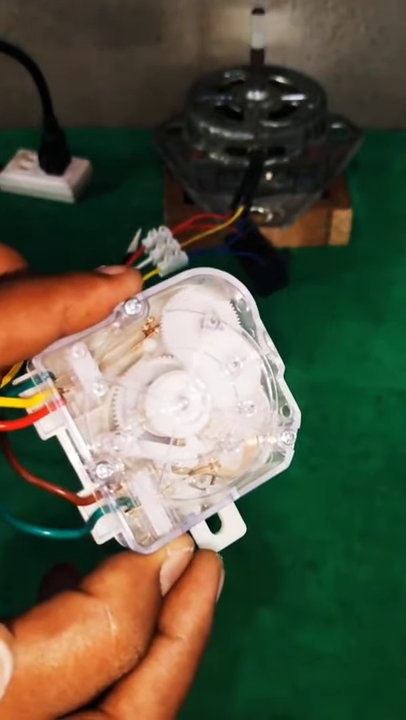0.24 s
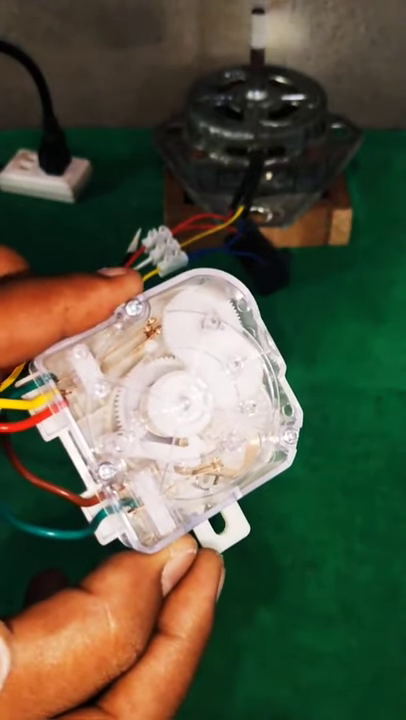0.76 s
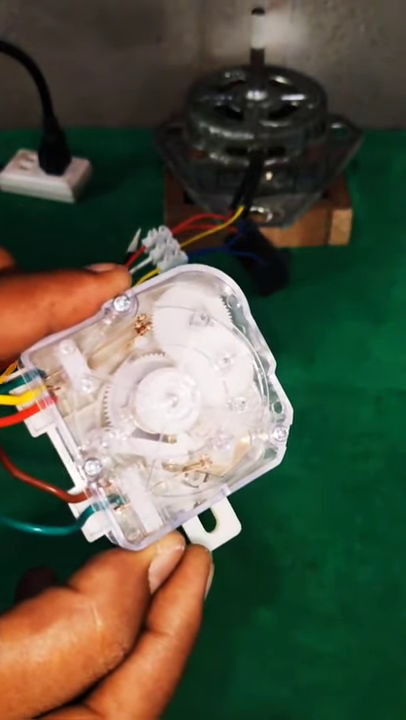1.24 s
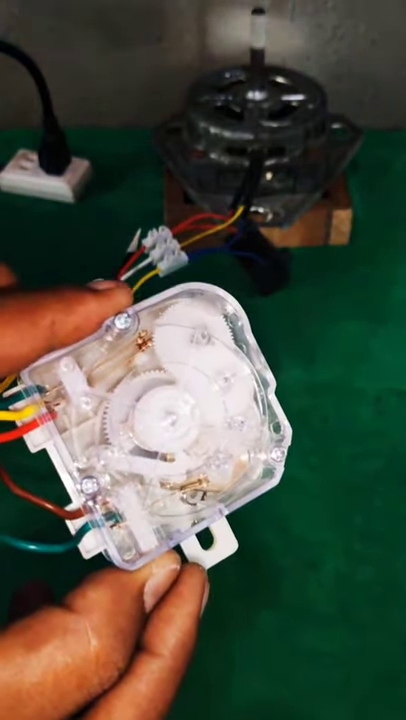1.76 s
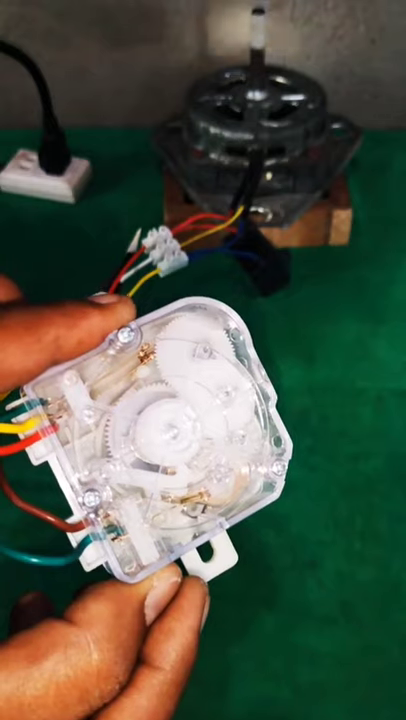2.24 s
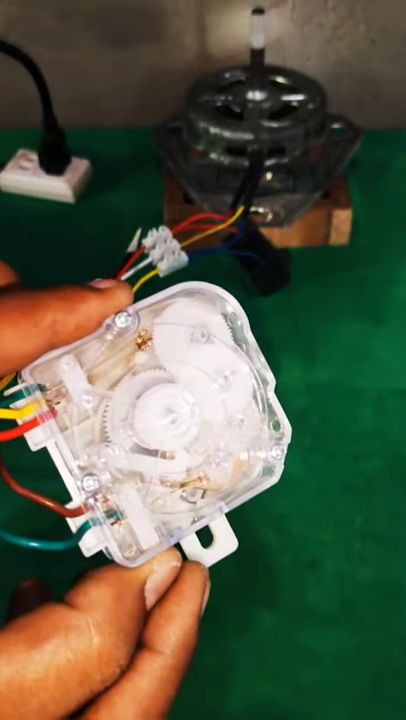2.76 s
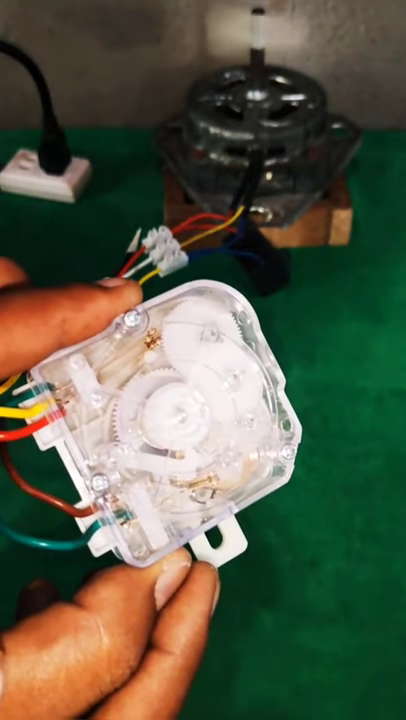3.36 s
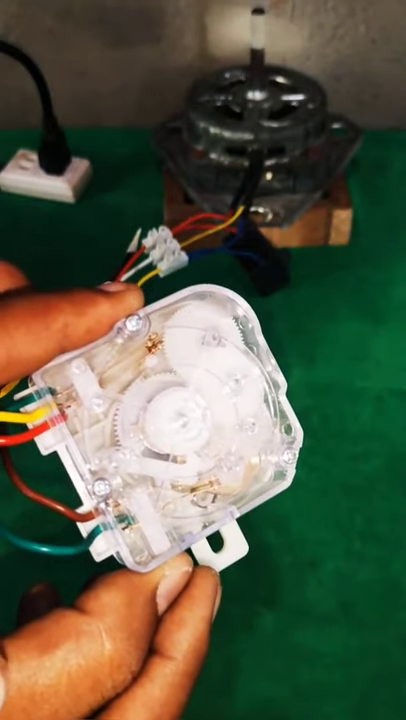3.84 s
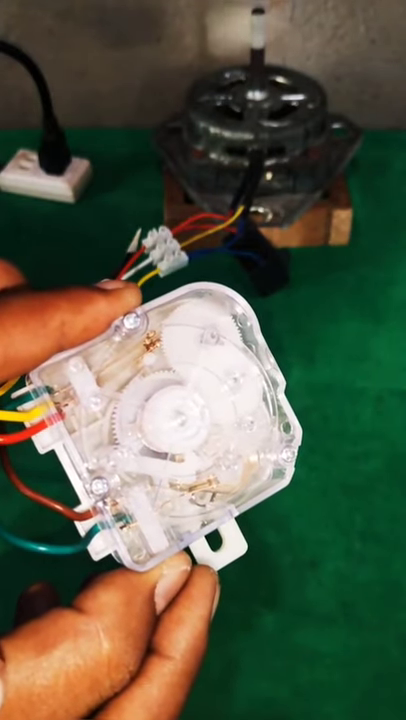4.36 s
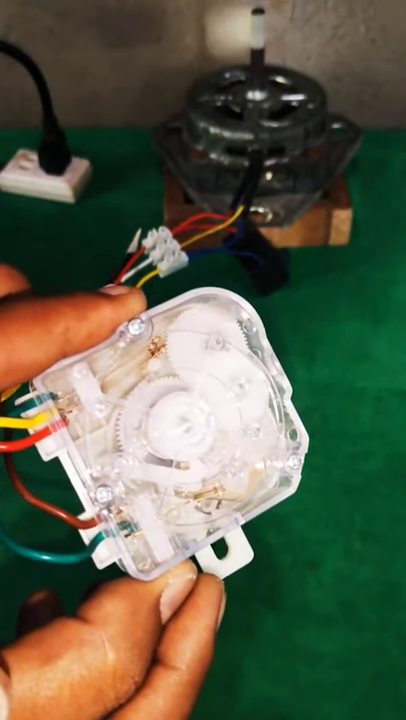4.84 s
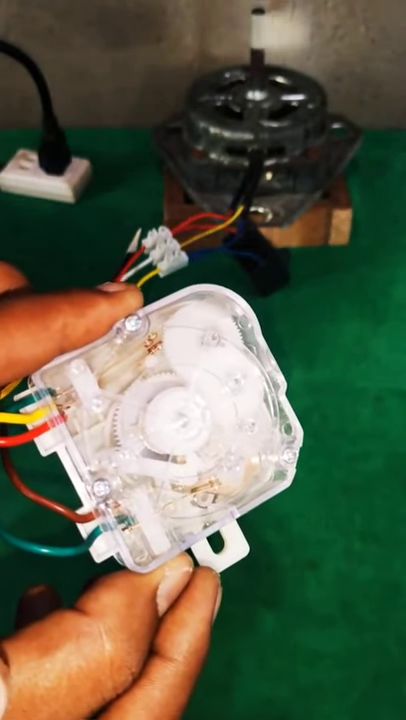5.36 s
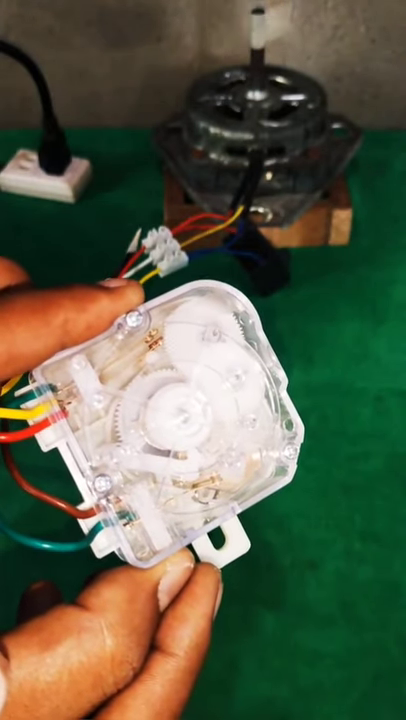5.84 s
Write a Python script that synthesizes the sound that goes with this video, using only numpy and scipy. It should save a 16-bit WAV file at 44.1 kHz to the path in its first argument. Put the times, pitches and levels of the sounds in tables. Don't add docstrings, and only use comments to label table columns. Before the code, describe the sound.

From 0 s a bare induction motor is already running on a wooden block, giving a loud, steady low hum near 120 Hz with faint beating overtones and a grainy chatter pulsing with each turn. Loose bearings knock irregularly in small metallic clusters, with a notably hard knock and snap around 0.17 s and another strong knock near 2.34 s. The bench adds a wandering low throb and occasional thumps. Close by, a clockwork timer ticks very fast, around 36 ticks a second, thin and light, gradually slowing slightly and weakening. At about 4.8 s a small contact snap comes and the hum collapses within a tenth of a second. Until 6.1 s the rotor coasts on a soft whirr, shuddering, with a sharp clack at 5.12 s and denser knocks and rattles from 5.4 s. Dry, close mono pickup, faint hiss.

```python
import sys
import numpy as np
from scipy import signal
from scipy.fft import rfft, irfft, next_fast_len
from scipy.io import wavfile
from scipy.ndimage import uniform_filter1d

SR = 44100
rng = np.random.default_rng(int(sys.argv[2]) if len(sys.argv) > 2 else 0)


def store_pcm(level_fs):
    pcm = np.round(np.clip(level_fs, -1, 1) * 32767).astype(np.int16)
    wavfile.write(sys.argv[1], SR, np.atleast_2d(pcm).T)


def convert_level_to_amplitude(level_db):
    exponent = np.asarray(level_db, float) / 20
    return 10 ** exponent


N = 268524


def rms_one(x):
    return x / np.sqrt(np.mean(x ** 2) + 1e-20)


def in_time(rows):
    s, *columns = np.transpose(rows)
    return [np.interp(np.arange(N) / SR, s, c) for c in columns]


def drift(rate_hz):
    r = np.exp(-80 * np.pi * rate_hz / SR)
    noise = rng.standard_normal(N // 40 + 1102)
    slow = signal.lfilter([1], [1, -2 * r, r * r], noise)[1100:]
    return np.interp(np.arange(N) / 40, np.arange(len(slow)), rms_one(slow))


def colour(x, points):
    size = next_fast_len(N + SR // 4, real=True)
    hz, db = np.transpose(points)
    log_hz = np.log(np.fft.rfftfreq(size, 1 / SR) + 1)
    gain_db = np.interp(log_hz, np.log(hz), db, left=-70, right=-90)
    cepstrum = irfft(gain_db * np.log(10) / 20, size)
    cepstrum[1:size // 2] *= 2
    cepstrum[size // 2 + 1:] = 0
    return rms_one(irfft(rfft(x, size) * np.exp(rfft(cepstrum)), size)[:N])


def resonance(x, hz, width_hz):
    r = np.exp(-np.pi * width_hz / SR)
    poles = [1, -2 * r * np.cos(2 * np.pi * hz / SR), r * r]
    return signal.lfilter([(1 - r * r) / 2, 0, (r * r - 1) / 2], poles, x)


def strike(times_s, levels_db, hz, t60_s, spread_db):
    contact_width_hz = 950
    clicks = np.full(N, 1e-18)
    at = np.clip((np.asarray(times_s) * SR).astype(int), 0, N - 1)
    peaks = convert_level_to_amplitude(levels_db + spread_db * rng.standard_normal(len(at)))
    clicks[at] = peaks * rng.choice([-1, 1], len(at))
    r = convert_level_to_amplitude(-60 / (t60_s * SR))
    w = 2 * np.pi * hz / SR
    touch = resonance(clicks, hz, contact_width_hz)
    return signal.lfilter([0, np.sin(w)], [1, -2 * r * np.cos(w), r * r], touch)


def grains(per_s, spread_db):
    sizes = convert_level_to_amplitude(spread_db * np.minimum(rng.exponential(1, N), 4)) * rng.choice([-1, 1], N)
    return rms_one(sizes * (rng.random(N) < per_s / SR))


def swell(s, length_s):
    out, start = np.zeros(N), int(s * SR)
    age = np.arange(int(length_s * SR)) / (length_s * SR)
    out[start:start + len(age)] = np.abs(np.sin(np.pi * age ** 0.56))[:N - start]
    return out


def swing(s, db, hz, length_s):
    out = swell(s, length_s)
    on = np.flatnonzero(out)
    out[on] *= convert_level_to_amplitude(db) * np.sin(2 * np.pi * hz * (on / SR - s))
    return out


def hiss():
    # f/Hz, density/dB per Hz
    hiss_spectrum = [(3000, -2), (4500, 2.5), (5500, -2), (7000, -4.5), (10000, -5), (14000, -7),
                     (18000, -4.5)]
    rms_db = -82.5 + 5.5
    return convert_level_to_amplitude(rms_db) * colour(rng.standard_normal(N), hiss_spectrum)


def timer():
    # t/s, ticks counted
    ticks = [(0, -.4), (.064, 1.85), (.492, 17.85), (.546, 19.85), (.817, 29.85), (.932, 33.85),
             (1.206, 43.85), (1.588, 57.85), (1.918, 69.85), (2.417, 87.85), (2.794, 101.85),
             (3.524, 127.85), (4.15, 149.85), (4.679, 167.85), (4.872, 173.85), (5.109, 181.85),
             (5.425, 191.85), (5.908, 207.85), (6.09, 213.88)]
    # f/Hz, tick level/dB, tock level/dB, t60/s
    case = [(2450, -63, -65, .01), (2850, -64, -65, .015), (3080, -60, -61, .03), (3350, -65, -66, .014),
            (3800, -68, -71, .01), (4500, -71, -75, .015), (6000, -84, -87, .01), (9000, -87, -90, .01),
            (11000, -87, -90, .01), (13800, -81, -89, .008), (14500, -78, -86, .01),
            (15100, -79, -87, .008)]
    # t/s, level/dB, f/Hz, t60/s
    snaps = [(0.168, -41, 3100, 0.018), (0.168, -65, 4330, .015), (.1665, -62, 6000, .012),
             (.168, -64, 8200, .012), (.169, -70, 7100, .012), (0.173, -35, 1138, 0.15),
             (5.123, -37, 1810, 0.087), (5.1235, -41, 2070, .03), (5.124, -43, 2330, .025),
             (4.808, -61, 5600, 0.0085), (4.809, -67, 8250, .01), (4.81, -69, 10000, .008)]
    s, count = np.transpose(ticks)
    number = np.arange(0, int(count[-1]) + 1)
    times_s = np.interp(number - .15, count, s) + 0.00071 * rng.standard_normal(len(number))
    out = np.zeros(N)
    for hz, tick_db, tock_db, t60_s in case:
        level_db = np.where(number % 2, tock_db, tick_db) + 4.5 - 0.84 * times_s
        out += strike(times_s, level_db, hz, t60_s, spread_db=2.5)
        out += strike(times_s + .003, level_db - 3, hz, t60_s, spread_db=3)
    return out + sum(strike([s], db, hz, t60_s, spread_db=0) for s, db, hz, t60_s in snaps)


def bench():
    # t/s, level/dB
    rumble_bed = [
        (0, -45),
        (4.8, -45),
        (4.95, -52.5),
        (5.17, -62),
        (5.27, -53),
        (6.09, -50),
    ]
    # t/s, peak level/dB
    surges = [(.01, -42), (.22, -34), (.34, -41), (0.469, -47), (.76, -38), (.88, -48), (1.161, -37),
              (1.62, -36.5), (1.71, -46), (1.85, -43), (2.03, -37.5), (2.2, -38), (2.559, -40.5),
              (2.939, -43), (3.36, -42), (3.51, -46), (3.68, -41), (3.9, -40.5), (4.19, -39.5),
              (4.371, -40.5), (4.66, -49), (4.83, -37.5), (5.74, -55)]
    # t/s, peak level/dB, f/Hz, length/s
    swings = [(0.164, -32, 77, 0.098), (3.85, -33.5, 76.5, 0.14), (4.801, -40, 69.6, 0.045),
              (5.09, -42, 142, 0.1), (5.22, -53, 139.3, 0.14), (5.49, -41, 78.3, 0.18),
              (5.576, -39, 83.7, 0.13), (5.698, -32.5, 82.6, 0.09), (5.751, -56, 590, 0.24),
              (5.768, -55.5, 765, 0.15), (5.841, -43, 78, 0.21), (5.31, -48.5, 131, 0.11),
              (5.95, -54, 151, 0.089), (4.99, -50, 142, 0.069)]
    surge_half_width_s = .03
    shake = resonance(resonance(rng.standard_normal(N), 67, 46), 80, 54)
    even = shake / np.sqrt(uniform_filter1d(shake ** 2, size=1500) + 0.045 * np.mean(shake ** 2))
    even = signal.sosfilt(signal.butter(4, [52, 95], "band", fs=SR, output="sos"), even)
    t = np.arange(N) / SR
    power = convert_level_to_amplitude(in_time(rumble_bed)[0]) ** 2
    for s, db in surges:
        power += convert_level_to_amplitude(db + 0.5) ** 2 * np.exp(-2 * ((t - s) / surge_half_width_s) ** 2)
    return np.sqrt(power) * rms_one(even) + sum(swing(*row) for row in swings)


def coasting():
    # t/s, block peak level/dB, block f/Hz, rattle level/dB, length/s
    shudders = [(4.865, -38.5, 218, -54.5, 0.047), (4.952, -36.5, 198, -46.5, 0.041),
                (5.053, -35.5, 209, -52, 0.044), (5.12, -33.5, 223.6, -42, 0.048),
                (5.14, -34.5, 205, -49.5, 0.04), (5.299, -46.5, 254, -55, 0.065),
                (5.402, -37.5, 200, -45.5, 0.03), (5.424, -34, 203, -45.5, 0.083),
                (5.502, -39.5, 211, -42, 0.05), (5.531, -38.5, 218, -44, 0.068),
                (5.545, -41, 197, -39, 0.037), (5.604, -41, 213, -44.5, 0.035),
                (5.647, -39, 234, -38.5, 0.015), (5.661, -32, 210, -41, 0.06),
                (5.727, -49, 264, -44, 0.038), (5.845, -40.5, 214, -44.5, 0.054),
                (5.905, -36.5, 202, -42, 0.056), (5.944, -61, 183, -44, 0.055),
                (5.979, -40, 200, -42.5, 0.047), (6.064, -36.5, 213, -43, 0.052)]
    # f/Hz, density/dB per Hz
    rattle_spectrum = [(76, -73.5), (130, -32), (211, 2), (341, -15.5), (407, -14.5), (457, -32.5),
                       (553, -10.5), (622, -18), (752, -14), (1290, -20), (1590, -45), (1710, -15.5),
                       (1840, -19), (3250, -46), (4290, -55), (5580, -85), (9440, -120)]
    # f/Hz, width/Hz, level/dB
    loose_parts = [(432, 52, 10.5), (590, 15, 5.5), (765, 18, -0.5), (880, 6.7, 10), (1310, 45, 13),
                   (1830, 59, 4.5), (1940, 57, -6), (2075, 75, 6), (2310, 37, 9.5), (3640, 55, 9),
                   (4500, 42, 10)]
    # t/s, level/dB
    coast = [
        (4.8, -51),
        (4.886, -53.5),
        (5.2, -51.5),
        (5.388, -54),
        (5.456, -48.5),
        (5.6, -52.5),
        (6.089, -51),
    ]
    # f/Hz, density/dB per Hz
    whirr_spectrum = [(59, -32), (100, -5.5), (165, -18.5), (200, 0), (387, -14), (418, -11.5),
                      (453, -25.5), (497, -11), (538, -31.5), (1750, -18.5), (4290, -43), (5580, -67),
                      (9440, -120)]
    block, shaking = np.zeros(N), np.zeros(N)
    for s, block_db, hz, rattle_db, length_s in shudders:
        block += swing(s, block_db, hz, length_s)
        shaking = np.maximum(shaking, convert_level_to_amplitude(rattle_db + 3.5) * swell(s + 0.0015, 1.54 * length_s))
    contacts = grains(450, 2.2) + 0.45 * rng.standard_normal(N)
    knocking = colour(shaking * contacts, rattle_spectrum)
    knocking += sum(convert_level_to_amplitude(db) * resonance(knocking, hz, width_hz) for hz, width_hz, db in loose_parts)
    rattle = convert_level_to_amplitude(-3.0) * np.sqrt(np.mean(shaking ** 2)) * rms_one(knocking)
    whirr_db, = in_time([(4.75, -89.5), *coast])
    whirr = convert_level_to_amplitude(whirr_db + 0.5 + 0.53 * drift(3.5)) * colour(rng.standard_normal(N), whirr_spectrum)
    return block + rattle + whirr


def knocks():
    # t/s, peak level/dB
    driven_knocks = [(0.0997, -39), (0.1295, -43.5), (0.1666, -24.5), (0.2004, -32.5), (0.3997, -46),
                     (0.482, -41), (0.5741, -36), (0.6075, -35.5), (0.8065, -33), (0.9815, -42),
                     (1.0157, -33), (1.05, -30), (1.1169, -43), (1.2146, -34.5), (1.4254, -46),
                     (1.4583, -32), (1.493, -42), (1.5243, -44), (1.5589, -44), (1.6592, -36.5),
                     (1.81, -42), (1.8342, -40), (1.8682, -37.5), (1.9016, -34.5), (2.028, -40),
                     (2.0955, -43), (2.2438, -46), (2.2777, -40), (2.3106, -34), (2.3441, -28.5),
                     (2.4438, -41.5), (2.505, -45), (2.543, -36.5), (2.6936, -42), (2.714, -38),
                     (2.753, -35.5), (2.7881, -33.5), (2.8856, -42), (2.9866, -33), (3.1615, -39),
                     (3.195, -34.5), (3.2291, -36), (3.261, -46.5), (3.3308, -38.5), (3.3878, -42),
                     (3.604, -36), (3.6381, -32.5), (3.6713, -35.5), (3.8638, -39), (3.955, -45.5),
                     (4.014, -41), (4.0472, -33), (4.0805, -36.5), (4.1814, -44), (4.2065, -42.5),
                     (4.2802, -36), (4.455, -38.5), (4.4897, -34), (4.5231, -30.5), (4.6242, -44)]
    # t/s, peak level/dB
    loose_knocks = [(4.8308, -39), (4.8405, -33), (4.8625, -50), (4.963, -47), (4.9723, -40), (5.0687, -39),
                    (5.1283, -34.5), (5.1423, -33), (5.1517, -31), (5.2096, -44.5), (5.4106, -40),
                    (5.4199, -45), (5.4368, -44), (5.4422, -41), (5.4507, -42), (5.4603, -26.5),
                    (5.4669, -42), (5.4751, -44), (5.4832, -53), (5.5071, -35), (5.5133, -33.5),
                    (5.5187, -42), (5.5258, -31), (5.5411, -45), (5.5519, -49), (5.5599, -37),
                    (5.5649, -35), (5.57, -32), (5.5801, -30.5), (5.6244, -33), (5.6469, -44),
                    (5.6542, -41), (5.6615, -44), (5.6709, -27), (5.6816, -30), (5.6878, -38),
                    (5.6993, -49), (5.7096, -43), (5.7199, -43), (5.7358, -31), (5.7414, -35),
                    (5.7488, -42), (5.7545, -42), (5.8607, -32.5), (5.8797, -40), (5.894, -43),
                    (5.9263, -37), (5.9368, -35), (5.9471, -33.5), (5.9538, -41), (5.9711, -43),
                    (5.9768, -45), (5.9913, -30.5), (6.0006, -33.5), (6.0056, -41), (6.0161, -48),
                    (6.0328, -45), (6.0539, -41), (6.0761, -38.5), (6.0817, -32.5)]
    # f/Hz, level/dB, t60/s
    shield = [(1700, -5, 0.045), (1785, 0, 0.11), (1923, 2.5, 0.054), (2070, -3.5, 0.06),
              (2315, -5.5, 0.04), (2460, -9.5, 0.03), (3000, -11, 0.019), (3630, -20.5, 0.065),
              (4460, -25, 0.064), (5680, -25, 0.031), (6900, -27.5, 0.017)]
    # f/Hz, level/dB, t60/s
    housing = [(681, -1.5, 0.054), (700, -2, 0.021), (973, -2, 0.082), (1111, 2.5, 0.044),
               (1193, 1.5, 0.028), (1333, 3, 0.025)]
    housing_share_db, housing_top_db = -3, -34.5
    out = np.zeros(N)
    for table, ring, bounce_db, gain_db in [(driven_knocks, .26, -7, -4.5), (loose_knocks, .42, -9, -6)]:
        s, peak_db = np.transpose(table)
        touches_s = np.concatenate([s - .0008, s + .0018])
        touch_db = np.concatenate([peak_db, peak_db + bounce_db])
        for hz, db, t60_s in shield:
            out += strike(touches_s, touch_db + db + gain_db, hz, ring * t60_s, spread_db=0.0)
    s, peak_db = np.transpose([*driven_knocks, *loose_knocks])
    low_db = np.minimum(peak_db + housing_share_db, housing_top_db)
    for hz, db, t60_s in housing:
        out += strike(s + 0.00301, low_db + db - 10.5, hz, t60_s, spread_db=1.0)
    out -= .7 * resonance(out, 1500, 250)
    return signal.sosfilt(signal.butter(2, 4200, fs=SR, output="sos"), out)


def beats():
    # f/Hz, level/dB re hum, place in the cycle (0-1)
    beat_lines = [(325, -31, .35), (568, -27, .35), (588, -26, 0.05), (639, -29.5, 0.5), (651, -26.5, 0.8),
                  (679, -28.5, .89), (717, -30, 0.97), (708, -32, 0.2), (738.5, -29.5, 0.2),
                  (807, -40, .62), (968, -34, .15), (975, -32, 0.3), (1187, -30.5, .05), (1208, -26.5, 1),
                  (1141, -29.5, 0.2), (1247, -31, 0.2), (1304, -34, 0.5)]
    slip_hz, slip_start_s, depth_db = 2.29, .1675, 17
    t = np.arange(N) / SR
    cycle = slip_hz * (t - slip_start_s)
    out = np.zeros(N)
    for hz, db, place in beat_lines:
        swell_db = depth_db * (np.cos(2 * np.pi * (cycle - place)) - 1)
        level = convert_level_to_amplitude(db + swell_db + 0.94 * drift(4.9))
        out += level * np.cos(2 * np.pi * hz * t + 0.7 * drift(4.0))
    return out


def motor():
    # t/s, hum level/dB, chatter level/dB
    running = [
        (0.0, -27.5, -45),
        (0.64, -27.5, -47.5),
        (2.61, -27.5, -46.5),
        (4.76, -27, -47.5),
    ]
    # t/s, hum level/dB, chatter level/dB
    power_off = [
        (4.82, -28.5, -45.5),
        (4.845, -33, -43.5),
        (4.87, -44, -49),
        (4.9, -44, -52),
        (4.96, -80, -65),
        (5.0, -90, -66),
    ]
    # pull multiple, level/dB rms, phase/rad
    hum_lines = [(1, 0.5, -2.5), (2, -21, -5), (3, -31.5, -6.5), (5, -36, 2.5), (6, -36, 2),
                 (7, -31.5, 1.54), (8, -36.5, 4.5), (10, -41.5, 0.5)]
    # pull multiple, turn multiple, level/dB re hum
    side_lines = [(0, 11, -32.5), (0, 26, -34), (1, 1, -35.5), (2, -1, -50), (2, 1, -33.5), (3, 1, -37),
                  (3, 2, -46), (3, 3, -40.5), (4, 2, -43.5), (4, 3, -39), (7, 2, -44.5), (10, 1, -36)]
    # f/Hz, density/dB per Hz
    frame_spectrum = [(79, -35.5), (135, -16.5), (154, -14), (178, -23.5), (237, -24), (361, -30.5),
                      (442, -36), (574, -32), (745, -34), (1020, -34.5), (1180, -28), (1430, -39),
                      (1650, -28), (2700, -36), (4290, -56.5), (5580, -93), (9440, -120)]
    # f/Hz, width/Hz, level/dB, swell/dB, lead/rad
    frame_modes = [(316.6, 24, 10, 0, -.2), (590, 24, -2.5, 0, 0.24), (715, 240, 10.5, 4.5, -2.5),
                   (910, 140, 0, -3.5, -.6), (1135, 99, 8.5, 5.5, 1.4), (2715, 90, 2.5, 9.5, 2.3),
                   (3042, 57, 4, 2, 0.21), (4035, 49, 8, -2.5, 1.7)]
    # f/Hz, width/Hz, depth/dB
    buzz = [(800, 140, -10), (1760, 970, -10)]
    hum_hz, turn_hz = 119.79, 29.375
    hum_start_rad, turn_start_rad = 2.79, .54
    hum_db, chatter_db = in_time([*running, *power_off])
    t = np.arange(N) / SR
    pull = 2 * np.pi * hum_hz * t + hum_start_rad
    turn = 2 * np.pi * turn_hz * t + turn_start_rad

    hum = beats()
    for k, db, phase in hum_lines:
        hum += convert_level_to_amplitude(db + 0.27 * k * drift(4.4)) * np.cos(k * pull + phase + 0.1 * k * drift(2.6))
    for k, m, db in side_lines:
        hum += convert_level_to_amplitude(db + 3.0 * drift(7.2)) * np.cos(k * pull + m * turn + 1.1 * drift(3))

    contacts = rng.standard_normal(N) + 0.5 * grains(2500, 2.8)
    lag = round(SR / turn_hz)
    for i in range(lag, N, lag):
        contacts[i:i + lag] += 0.35 * contacts[i - lag:i][:N - i]
    swell_db = 2.2 * np.cos(turn) + 1.2 * np.cos(2 * turn + 0.37)
    swell_db += 0.88 * np.cos(pull - hum_start_rad - 3 * turn - 1.2) + 1.37 * drift(4.9)
    slip = pull - 4 * turn
    swell_db += 0.6 * np.cos(slip - 3.4) + 0.11 * np.cos(2 * slip - .1)
    broad = colour(contacts * convert_level_to_amplitude(swell_db), frame_spectrum)
    chatter = broad.copy()
    for hz, width_hz, db, turn_db, lead in frame_modes:
        rubbed = broad * convert_level_to_amplitude(turn_db * np.cos(turn + lead))
        chatter += convert_level_to_amplitude(db) * resonance(rubbed, hz, width_hz)
    pulled = chatter * np.cos(pull - hum_start_rad)
    chatter += sum(convert_level_to_amplitude(db) * resonance(pulled, hz, width_hz) for hz, width_hz, db in buzz)
    return np.sqrt(2) * convert_level_to_amplitude(hum_db) * hum + convert_level_to_amplitude(chatter_db + 2.0) * rms_one(chatter)


def scene():
    return (hiss() + timer() + bench() + coasting() + knocks() + motor())[None]


def band_limit(x):
    return signal.sosfilt(signal.butter(12, 15504, fs=SR, output="sos"), x)


def record(dry):
    return band_limit(dry)


dry = scene()
out = record(dry)
store_pcm(out)
```